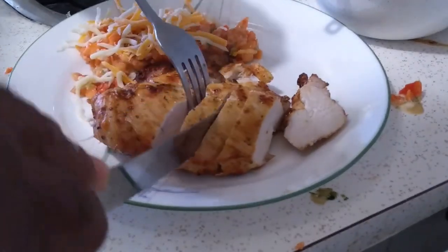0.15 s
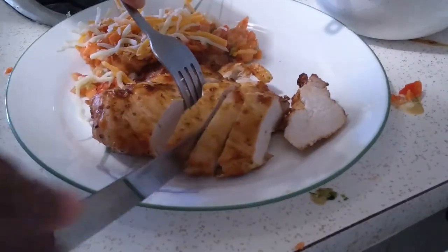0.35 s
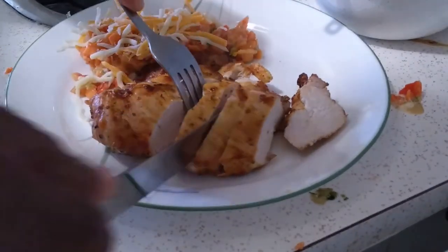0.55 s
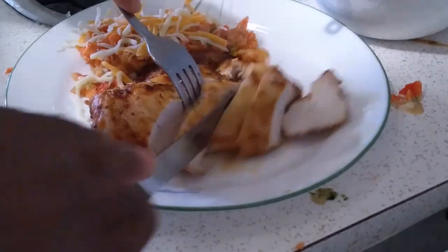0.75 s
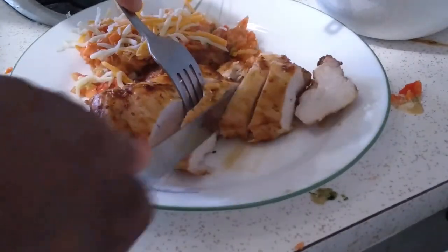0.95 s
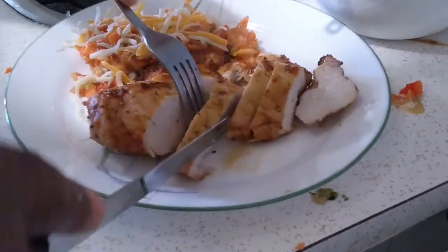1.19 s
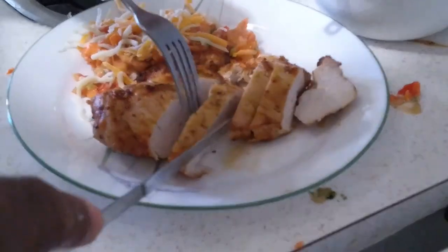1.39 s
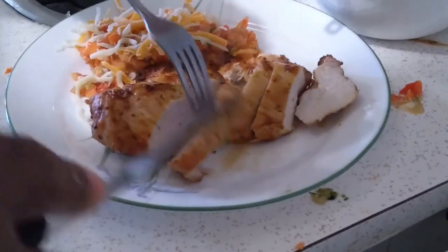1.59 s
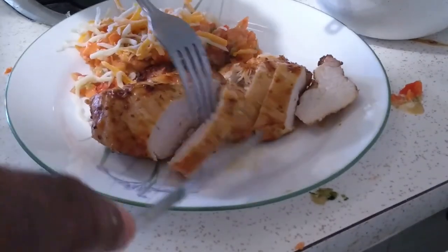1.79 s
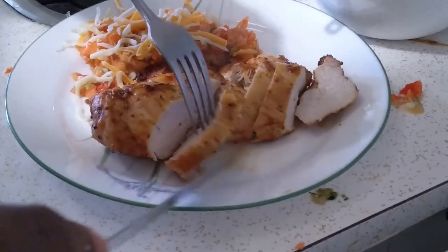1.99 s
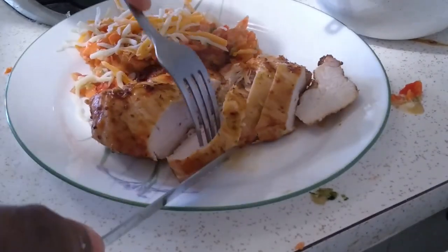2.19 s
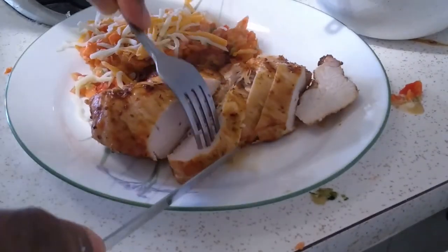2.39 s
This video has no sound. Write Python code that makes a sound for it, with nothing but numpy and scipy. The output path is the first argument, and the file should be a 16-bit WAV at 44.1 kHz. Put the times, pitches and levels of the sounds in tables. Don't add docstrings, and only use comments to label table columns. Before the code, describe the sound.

Close cutlery on a plate in a small reflective kitchen: a hard tap with a low thud, short serrated scrapes, a brief squeaky slide and a loud knock, then near quiet, a rim clink and a faint graze.

```python
import sys
import numpy as np
from scipy import signal
from scipy.fft import rfft, irfft
from scipy.io import wavfile

SR = 44100
rng = np.random.default_rng(int(sys.argv[2]) if len(sys.argv) > 2 else 0)


def waveform_to_disk(signal):
    frames = np.transpose(np.atleast_2d(signal))
    scaled = np.clip(frames, -1, 1) * 32767
    samples = np.round(scaled).astype(np.int16)
    wavfile.write(sys.argv[1], SR, samples)


def field_ratio(decibels):
    return 10 ** (np.asarray(decibels, dtype=float) / 20)


N = 108045


def read(points, hz):
    f, value = np.transpose(points)
    return np.interp(np.log(hz + 1), np.log(f + 1), value)


def unit(x):
    return x / np.sqrt(np.sum(x ** 2) + 1e-30)


def shade(x, points):
    gain = field_ratio(read(points, np.fft.rfftfreq(len(x), 1 / SR)))
    return irfft(rfft(x) * gain, len(x))


def ring(hz, db, t60, t):
    return field_ratio(db - 60 * t / t60) * np.sin(2 * np.pi * hz * t)


def click(points):
    log_gain = np.log(field_ratio(read(points, abs(np.fft.fftfreq(8192, 1 / SR)))))
    return np.fft.ifft(np.exp(np.conj(signal.hilbert(log_gain)))).real


def hush():
    # (pitch [Hz], level [dB per Hz])
    air_colour = [(25, -28.5), (62, 0), (150, -9.5), (300, -9.5), (700, -18), (6800, -31.5), (7300, -27.5),
                  (16000, -50)]
    x = shade(rng.standard_normal(N + N % 2), air_colour)[:N]
    return field_ratio(-67) * x / x.std()


def kitchen():
    # (pitch [Hz], time to fall 60 dB [s])
    room_decay = [(300, 0.27), (1000, 0.1514), (2500, 0.1299), (5000, 0.1191), (9000, 0.1127),
                  (15000, 0.153)]
    wet_db, first_echo_s, build_s = 6.5, 0.00074, 0.0014
    late_db, late_slower = -21, 2.778
    echoes = np.zeros(SR // 2)
    at = np.arange(0, SR // 2 - 10, 10)
    at = at + rng.integers(0, 10, len(at))
    echoes[at] = rng.choice([-1., 1.], len(at))
    hz, t, z = signal.stft(echoes, SR, nperseg=128)
    fall_db = -60 * t / read(room_decay, hz)[:, None]
    decay = field_ratio(fall_db) + field_ratio(late_db + fall_db / late_slower)
    tail = signal.istft(z * decay, SR, nperseg=128)[1]
    tail = tail * np.clip((np.arange(len(tail)) / SR - first_echo_s) / build_s, 0, 1)
    return np.r_[1, field_ratio(wet_db) * unit(tail)[1:]]


def ticks():
    # (time [s], level [dB], pitch [Hz], time to fall 60 dB [s])
    faint_ticks = [
        (1.88, -66.5, 7275, 0.126),
        (2.262, -76, 9524, 0.266),
        (2.262, -75, 5830, 0.146),
        (1.41, -81, 8200, 0.084),
        (2.2, -68, 70.2, 0.23),
        (1.71, -78.5, 9516, 0.087),
        (1.7, -78, 7670, 0.108),
    ]
    out, t = np.zeros(N + SR), np.arange(SR // 4) / SR
    for s, db, hz, t60 in faint_ticks:
        spread = rng.uniform(.93, 1.07, 12)
        fuzz = sum(ring(hz * f, db, t60, t) * rng.choice([-1, 1]) for f in spread)
        out[round(s * SR):][:len(t)] += fuzz * np.minimum(t / 0.00241, 1)
    return out[:N]


def thuds():
    # (pitch [Hz], level [dB], time to fall 60 dB [s])
    rock_modes = [(149.6, -19, 0.16), (301.93, -2.5, -0.14), (336.1, 3, 0.0842), (490, -23.5, 1.84),
                  (564, -17.5, 0.82), (640, -18.5, 0.42), (762, -16.5, -0.03)]
    # (time [s], level [dB], extra level of the two lowest modes [dB])
    thud_times = [
        (.224, -37, -6),
        (0.251, -49, -2),
        (0.362, -59.5, -11),
        (0.524, -63.5, 0.5),
        (0.58, -71, 4),
        (1.099, -63.5, -1.5),
        (2.031, -42, 4),
        (2.075, -52, 2.5),
        (2.36, -56.5, -14.5),
    ]
    most_cycles = 48
    out, t = np.zeros(N + SR), np.arange(SR // 4) / SR
    for s, db, low_db in thud_times:
        rock = 0
        for k, (hz, mode_db, t60) in enumerate(rock_modes):
            level = db + mode_db + low_db * (k < 2)
            fall = 60 * (t / min(t60, most_cycles / hz)) ** 2
            rock = rock + field_ratio(level - fall) * np.sin(2 * np.pi * hz * t)
        out[round(s * SR):][:len(t)] += rock * np.minimum(t / 0.0047, 1)
    return out[:N]


def sings():
    # (time [s], pitch [Hz], level [dB])
    songs = [
        [(.71, 960, -69), (.73, 966.2, -62), (.765, 969.4, -62), (.785, 1011, -55.5), (.8, 1024, -61.5),
         (.82, 1040, -49.5), (.835, 1052, -87.5), (.855, 1076, -60), (.875, 1075, -69.5)],
        [(.975, 1000, -68.5), (.99, 984.1, -48.5), (1.01, 948, -42.5), (1.025, 952.3, -42.5), (1.04, 1000, -55)],
    ]
    width_hz = 29
    r = np.exp(-np.pi * width_hz / SR)
    out, t = np.zeros(N), np.arange(N) / SR
    for rows in songs:
        s, hz, db = np.transpose(rows)
        wander = signal.lfilter([1 - r], [1, -r], [1, 1j] @ rng.standard_normal((2, N)))
        turns = np.cumsum(np.interp(t, s, hz)) / SR
        tone = ((1 + wander / wander.std()) * np.exp(2j * np.pi * turns)).real
        out += tone * field_ratio(np.interp(t, s, db, -150, -150))
    return out


def body(modes, crack_colour, crack_db):
    thin_hz, spread_s = 865, 0.00099735
    t = np.arange(8192) / SR
    rings = 0
    for hz, width, db in modes:
        t60 = np.log(1000) / np.pi / max(width, 15)
        start = 1 - np.exp(-2 * np.pi * width * t)
        rings = rings + width * start * ring(hz, db, t60, t)
    u = np.linspace(0, 1, 4097)
    lag = np.cumsum(spread_s * (1 - np.sqrt(u))) * SR / 8192
    crack = irfft(rfft(click(crack_colour)) * np.exp(-2j * np.pi * lag))
    crack = field_ratio(crack_db) * unit(crack * (t < .05)) * np.linalg.norm(rings)
    thin = signal.butter(8, thin_hz, "high", fs=SR, output="sos")
    return unit(signal.sosfilt(thin, rings + crack))


def stroke(rows, taps):
    stroke_db, grits_per_s, grit_spread_db = -8, 1300, 1
    dull_hz, tap_dull = 1728, 0.94
    s, db, dull = np.transpose(rows)
    t = np.arange(N) / SR
    grit = field_ratio(grit_spread_db * np.minimum(rng.exponential(1, N), 3))
    grit = grit * (rng.random(N) < grits_per_s / SR)
    grit = grit * rng.choice([-1., 1.], N)
    pressure = field_ratio(stroke_db + np.interp(t, s, db, -150, -150))
    grit = grit / grit.std() * pressure
    soft = signal.butter(4, dull_hz, "low", fs=SR, output="sos")
    hard = signal.butter(4, dull_hz, "high", fs=SR, output="sos")
    share = np.clip(np.interp(t, s, dull), 0, 1)
    dull_part = signal.sosfilt(soft, share * (2 * grit + tap_dull * taps))
    return dull_part + signal.sosfilt(hard, 2 * (1 - share) * grit + taps)


def contact(k):
    # (pitch [Hz], width [Hz], level [dB])
    tip_down = [(1435, 100, -9.5), (1162, 140, 6), (1427, 450, -8), (2292, 130, 0.5), (3551, 210, 1.5),
                (4696, 130, -10), (5764, 780, -4), (9013, 630, -13.5)]
    push = [(1047, 80, 1), (1456.4, 115, 5.5), (1278, 177, -5.5), (2530, 330, 5.5), (4126, 310, 0.5),
            (6816, 320, -16.5), (8398, 250, -3.5), (9110, 750, -4.5), (14120, 2140, -17.5)]
    pull = [(1000, 69, -10), (1279, 98, -3), (1470, 120, -1.5), (2562, 300, 3), (4037, 420, -5.5),
            (6375, 270, -8), (8830, 1200, -7), (12980, 1020, -17.5)]
    lift = [(1097, 94, 5), (1520, 60, -2.5), (1842.6, 55, -3), (2243, 20, -0.5), (4195, 70, 1.5),
            (4596, 89, 1.5), (5553, 38, -3), (6040, 130, -3), (6610, 60, -1), (6753, 35, -2.5),
            (8257, 370, -7), (10780, 190, -18), (12500, 315, -22.5), (14586, 560, -20.5)]
    saw = [(1038.5, 23, 6.5), (1144.3, 180, 12), (1620, 40, -4), (2333.2, 150, 6), (4317, 400, -3.5),
           (5320, 67, -4.5), (7000, 240, -17), (8000, 200, -20), (10800, 830, -23), (12500, 900, -25),
           (14500, 1200, -26.5)]
    through = [(1150, 150, -20), (1630, 140, -19.5), (2208, 120, 8), (3434, 67, 10.5), (4500, 250, -18),
               (5870, 250, -3), (6700, 190, -7), (8680, 170, -16.5)]
    rim = [(815.6, 206, -6.5), (1615, 156, -1), (1798, 64, -30.5), (2566.4, 257, 5.5), (2861, 160, 1),
           (3312, 189, 1), (4033, 110, 0), (4427, 152, 2.5), (5284, 1064, 1), (6181, 673, -1.5),
           (8590, 1200, -4), (12430, 920, -10.5), (14200, 160, -22)]
    graze = [(3600, 42, -20.5), (2707, 69, -3), (4087, 93, 12.5), (4522, 40, -0.5), (5880, 42, 6.5),
             (5871, 115, 5.5), (6340, 59, 8.5), (7223, 115, 2), (8930, 205, 4), (9740, 69, 2.5),
             (11360, 103, -2.5)]
    skid = [(2070, 91, 2.5), (2550, 160, -2.5), (3358, 58, -2.5), (4536, 150, -9.5), (5970, 143, -12),
            (7520, 107, -8), (9315, 133, -9), (12500, 350, -20)]
    catch = [(969, 68, -2), (1538, 40, -2.5), (2150, 44, -10.5), (2410, 65, -12), (3660, 110, -13),
             (4450, 36, -6), (4870, 25, -16.5), (6620, 51, -3), (8050, 110, -9), (8910, 29, -15)]
    places = [tip_down, push, pull, lift, saw, through, rim, graze, skid, catch]
    # (time [s], level [dB])
    tap_times = [
        [(.2243, 0), (.2292, -10.5), (.2322, -2), (.2374, -11)],
        [(.3625, -7), (.368, -17), (.4182, -9), (.4235, -21.5), (.4295, -32)],
        [(.564, -22.5), (.5705, -22), (.581, -8.5), (.5925, -19), (.6125, -18.5), (.626, -24.5)],
        [(.772, -39), (.785, -38)],
        [(1.0125, -11), (1.025, -22), (1.0425, -17), (1.058, -17), (1.068, -16.5)],
        [(1.0985, 1.5), (1.1025, -13.5)],
        [(2.0302, -5.5), (2.0312, -3), (2.0345, -3.5), (2.0385, -13)],
        [(2.348, -40), (2.362, -36), (2.385, -47.5)],
        [(.513, -32.5), (.522, -24.5), (.5265, -22.5)],
        [(.9615, -34), (.977, -34), (.9935, -27.5)],
    ]
    strokes = {1: [(.348, -52, 0), (.361, -54, 0.2), (.372, -33, 1), (.393, -33.5, 0.04),
               (.405, -59.5, 0.33), (.43, -49.5, 0.55), (.45, -59, 1)], 2: [(.515, -61.5, 0.09),
               (.53, -37.5, 0.32), (.54, -38, 0.79), (.55, -33.5, 0.7), (.575, -48.5, .7), (.6, -37, 0.7),
               (.625, -37, 0.89), (.645, -55.5, 0)], 3: [(.7, -61, 0.23), (.74, -54.5, 0.24),
               (.775, -42.5, 0.42), (.8, -61.5, 0.03), (.818, -65, 0), (.84, -64.5, 0), (.9, -77, 0.58)],
               4: [(.985, -57.5, 0.95), (1.005, -41.5, 0.65), (1.015, -40.5, 0.48), (1.04, -31.5, 0.25),
               (1.065, -33.5, 0.3), (1.08, -39.5, 0.9), (1.095, -58, 0.83)], 7: [(2.34, -64, 0.2),
               (2.362, -55.5, 0.01), (2.39, -94, 0.16), (2.44, -79, 0.08)], 8: [(.503, -56.5, 0.07),
               (.515, -40.5, 0.4), (.535, -43.5, 0.35), (.555, -60.5, 0.22)], 9: [(.955, -63.5, 0),
               (.965, -56.5, 0), (.98, -50.5, 0), (1.0, -40.5, 0.9), (1.015, -55.5, .5)]}
    crack_levels = [1.5, -3.5, 0, -12, -1.5, 9.5, -20.5, -31.5, -9, -18.5]
    # (pitch [Hz], level [dB])
    tap_colour = [(600, -33), (1250, 3), (1950, -15), (2400, -3), (6300, 4.5), (7300, -4.5), (9000, -5.5),
                  (15500, -25)]
    # (pitch [Hz], level [dB])
    grit_colour = [(700, -8.5), (1250, 9), (1900, -7), (2500, -0.5), (6300, 0), (9200, -12.5),
                   (10500, -23.5), (16000, -32)]
    drive = np.zeros(N)
    for s, db in tap_times[k]:
        drive[round(s * SR)] += field_ratio(db)
    colour = tap_colour
    if k in strokes:
        drive = stroke(strokes[k], drive)
        colour = grit_colour
    sound = body(places[k], colour, crack_levels[k])
    spot = (np.arange(N) + 200) // 400 % 3
    start = round(tap_times[k][0][0] * SR) - SR // 10
    heard = 0
    for j in range(3):
        part = (drive * (spot == j))[start:start + SR // 3]
        heard = heard + signal.fftconvolve(part, signal.fftconvolve(sound, kitchen()))
    return np.pad(heard, (start, N))[:N]


def scene():
    background = hush() + ticks() + thuds() + sings()
    return (background + sum(contact(k) for k in range(10)))[None]


def roll_off(x):
    return signal.sosfilt(signal.butter(12, 16660, fs=SR, output="sos"), x)


def record(dry):
    # (pitch [Hz], level [dB])
    gate = [(6800, -130), (7000, -90), (9500, -92), (11000, -89), (15700, -84), (16300, -55)]
    hz, t, z = signal.stft(dry[0], SR, nperseg=2048, noverlap=1024)
    bands = z[:1024].reshape(64, 16, -1)
    band_hz = hz[8:1024:16, None]
    band_db = 10 * np.log10((abs(bands) ** 2).sum(1) * 4 / 3 + 1e-20)
    masked = np.where(band_hz > 10500, band_db.max(0) - 39, -200)
    floor_db = np.maximum(read(gate, band_hz), masked)
    keep = np.clip((band_db - floor_db) / 2, 0, 1)
    gated = np.r_[(bands * keep[:, None]).reshape(1024, -1), z[1024:]]
    mix = signal.istft(gated, SR, nperseg=2048, noverlap=1024)[1][None, :N]
    return roll_off(mix)


dry = scene()
out = record(dry)
waveform_to_disk(out)
```